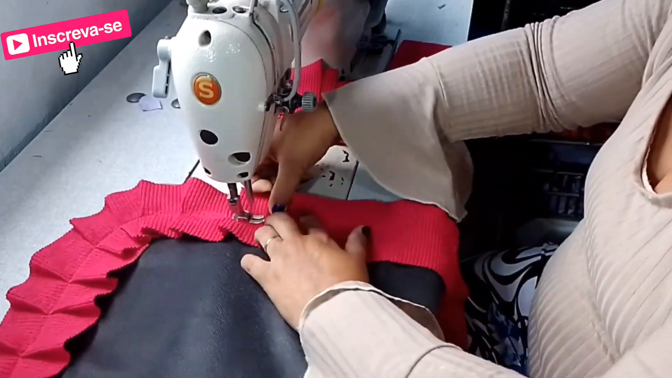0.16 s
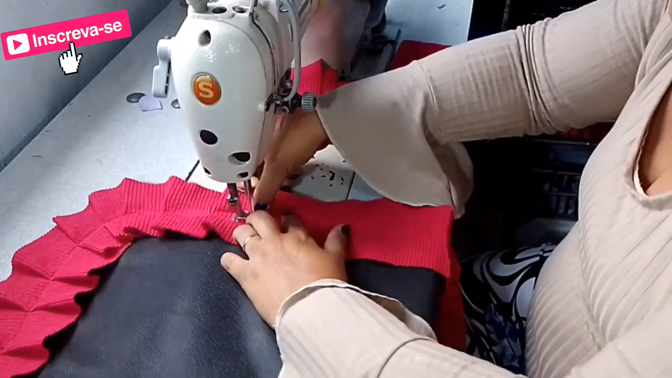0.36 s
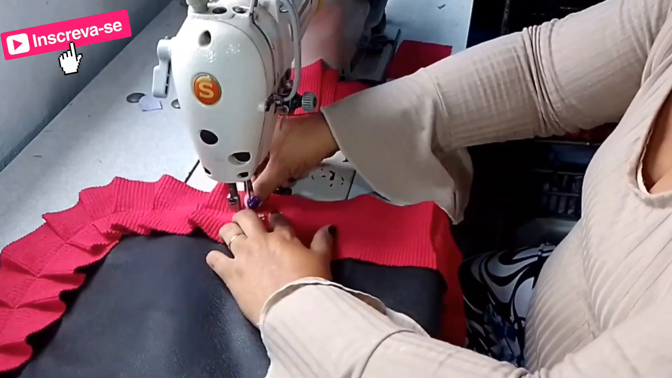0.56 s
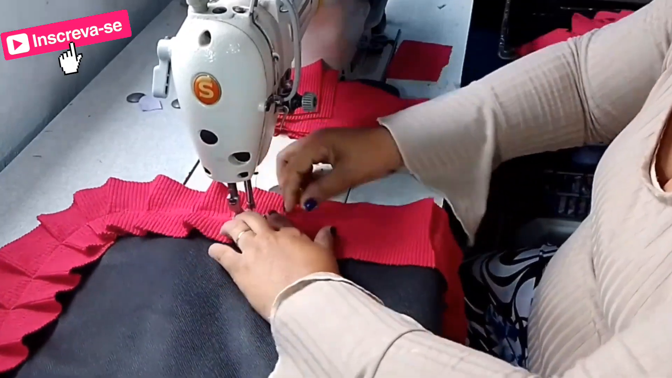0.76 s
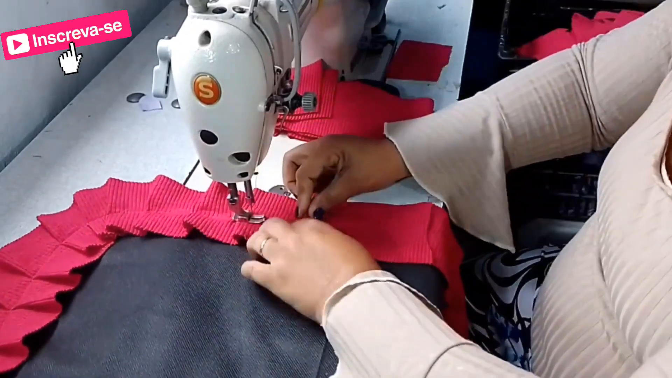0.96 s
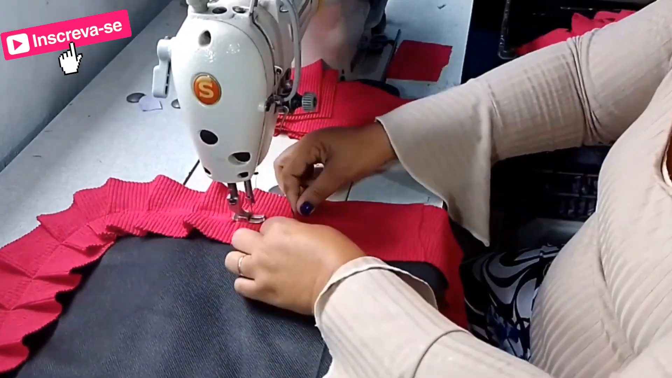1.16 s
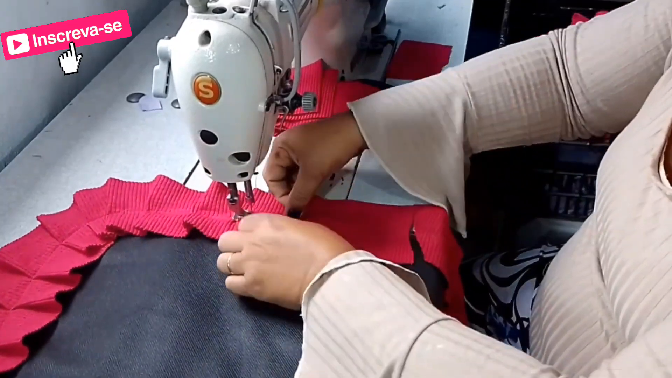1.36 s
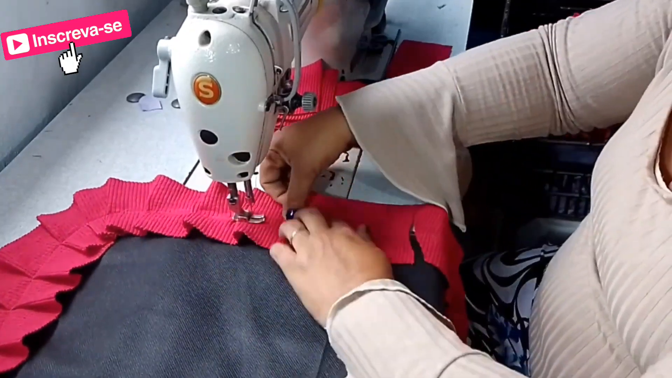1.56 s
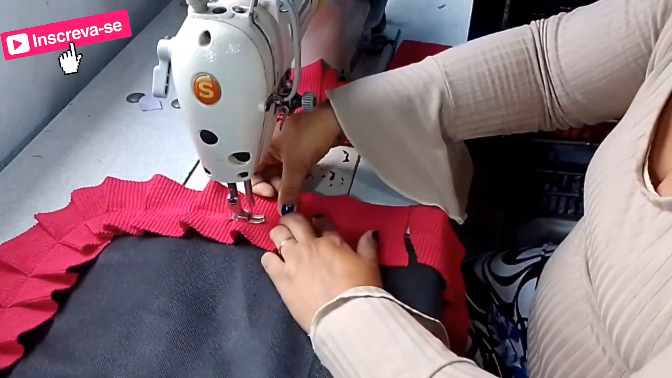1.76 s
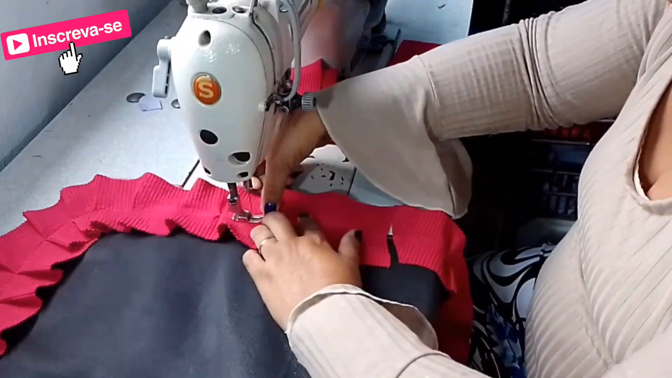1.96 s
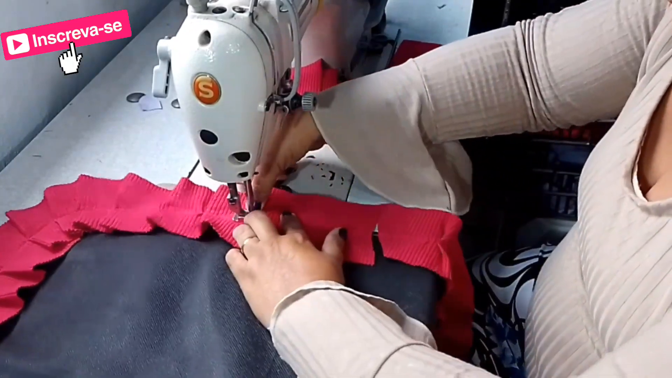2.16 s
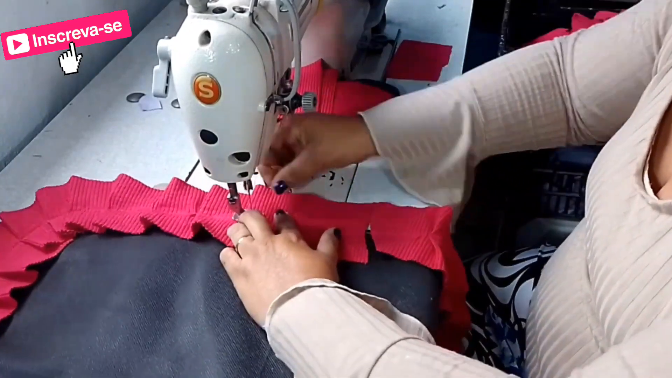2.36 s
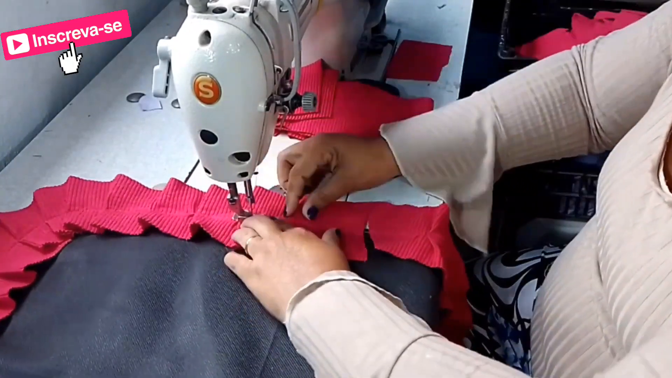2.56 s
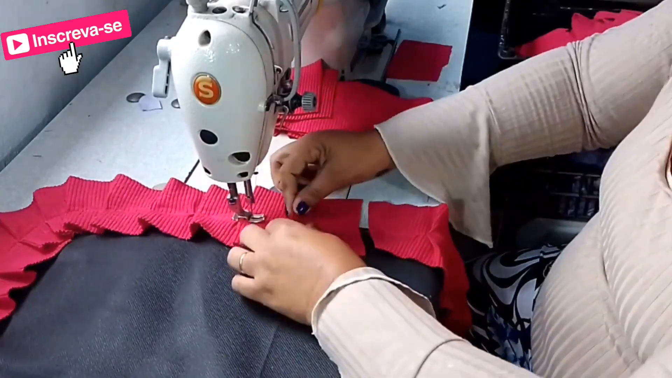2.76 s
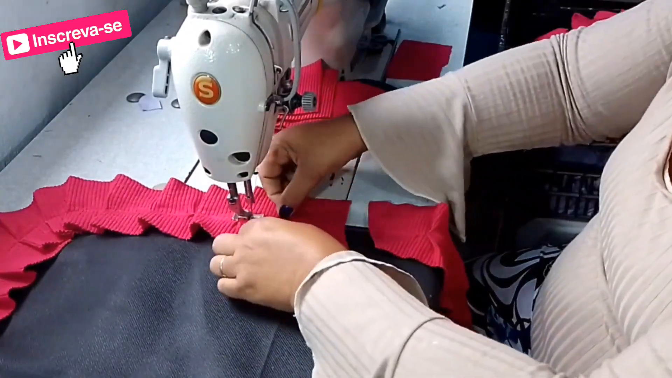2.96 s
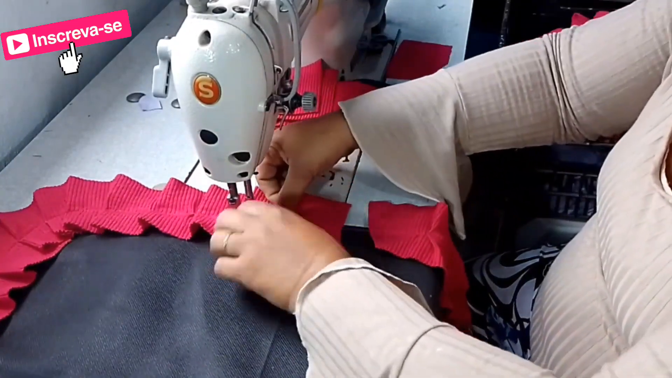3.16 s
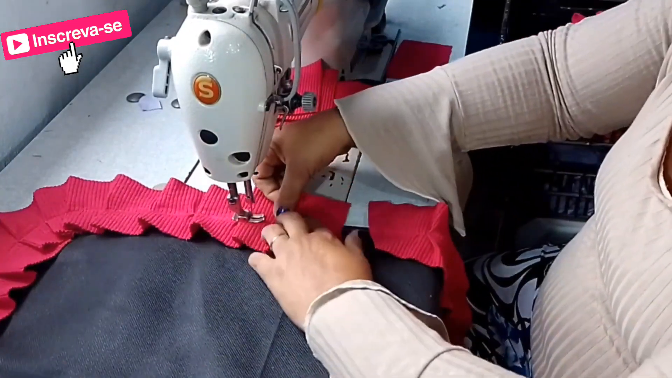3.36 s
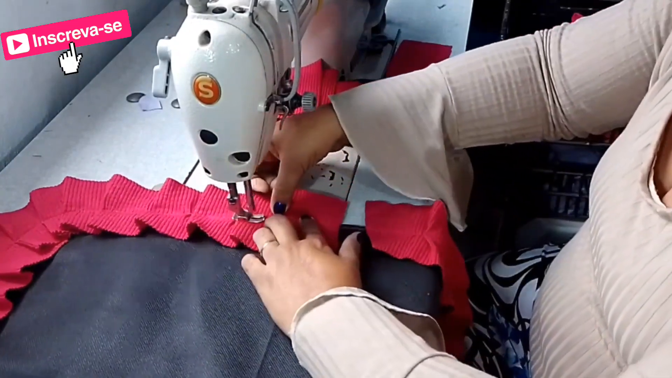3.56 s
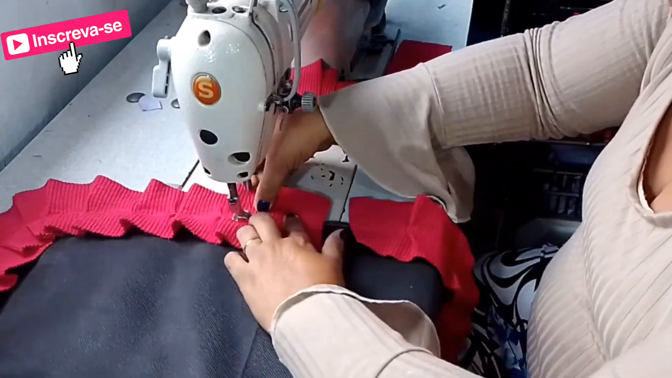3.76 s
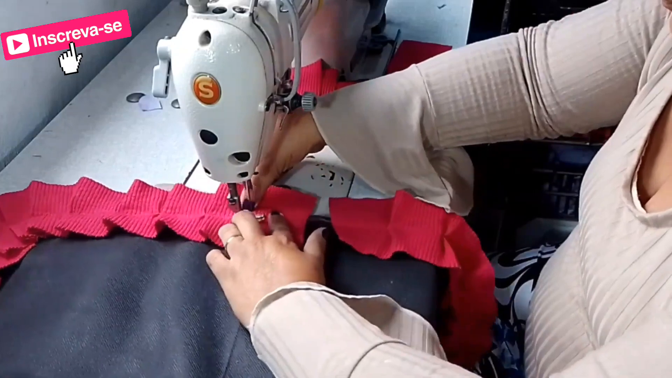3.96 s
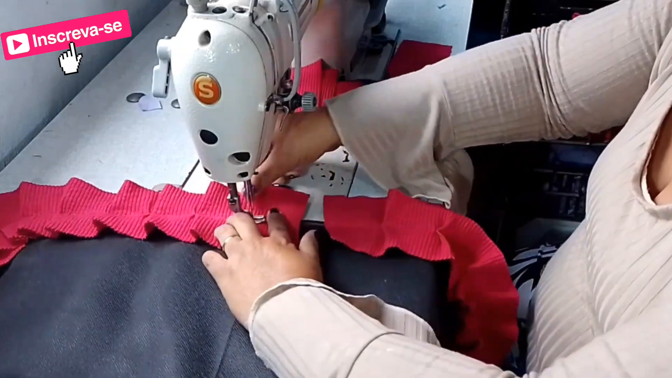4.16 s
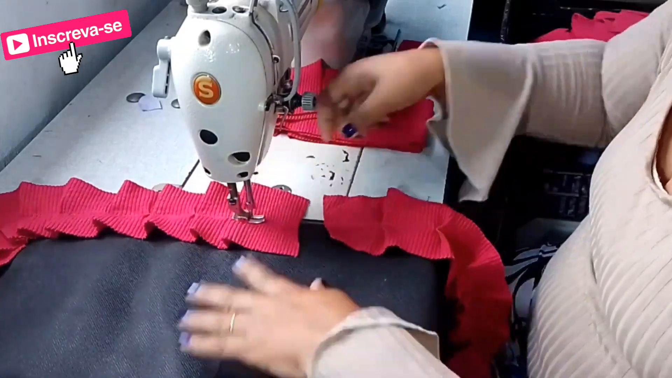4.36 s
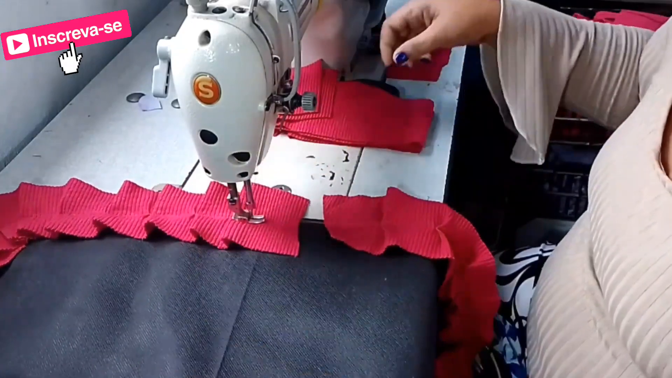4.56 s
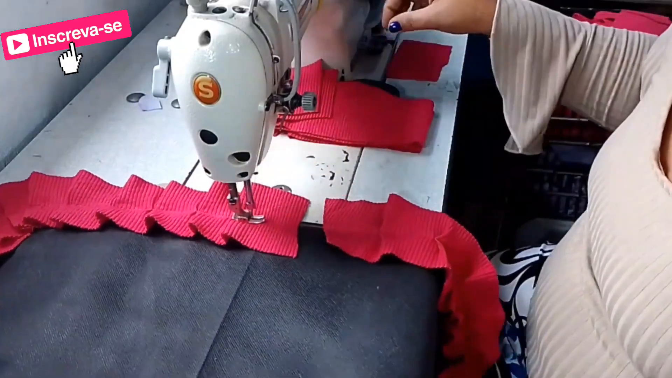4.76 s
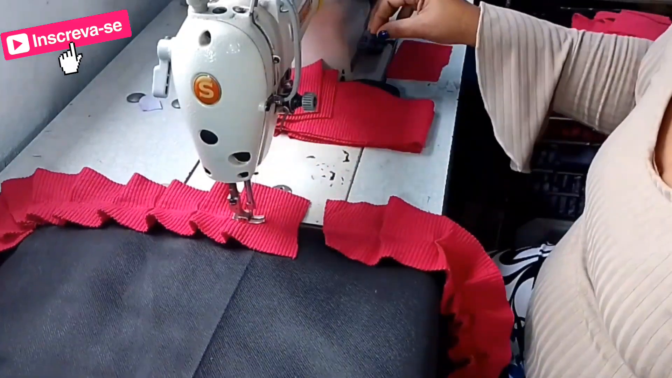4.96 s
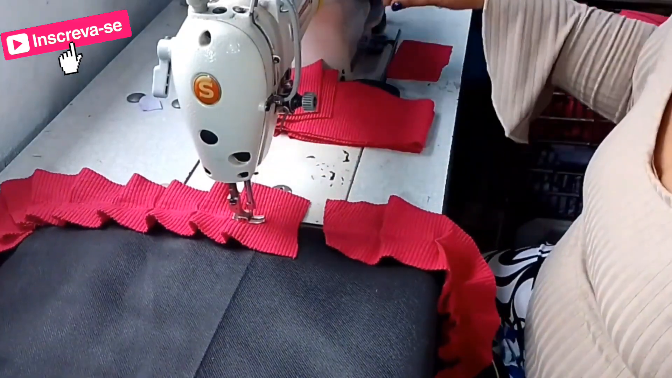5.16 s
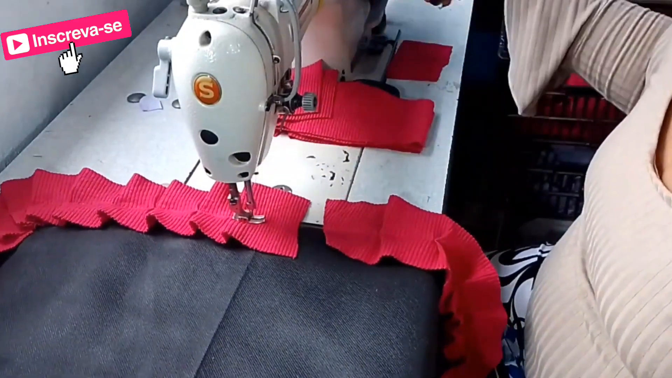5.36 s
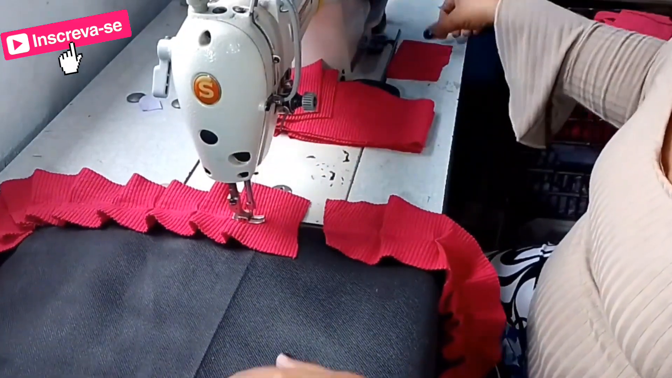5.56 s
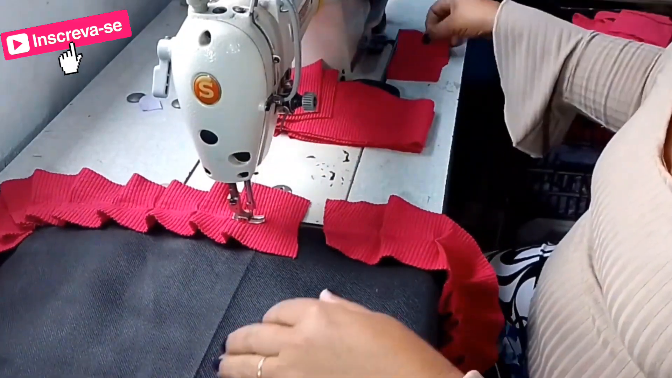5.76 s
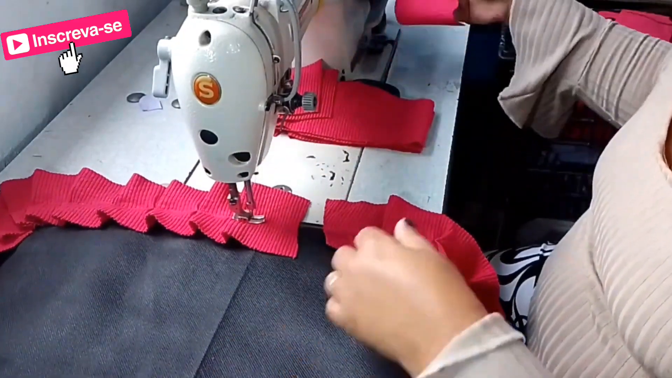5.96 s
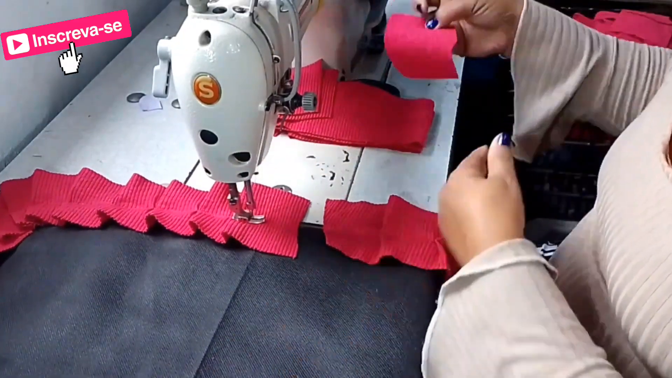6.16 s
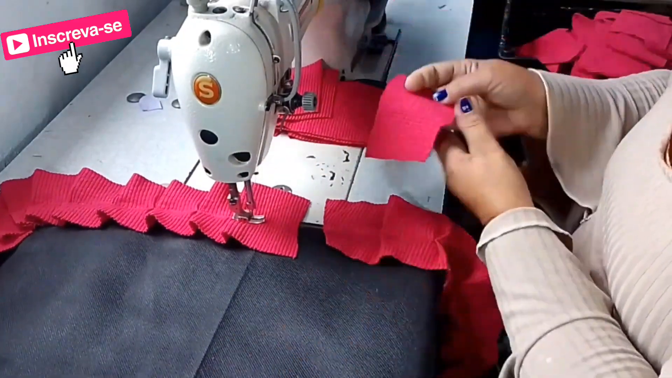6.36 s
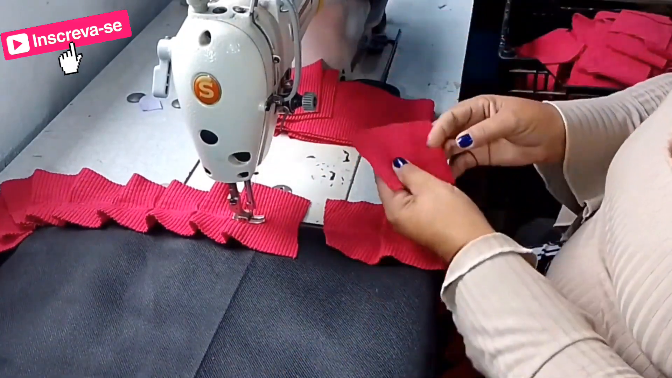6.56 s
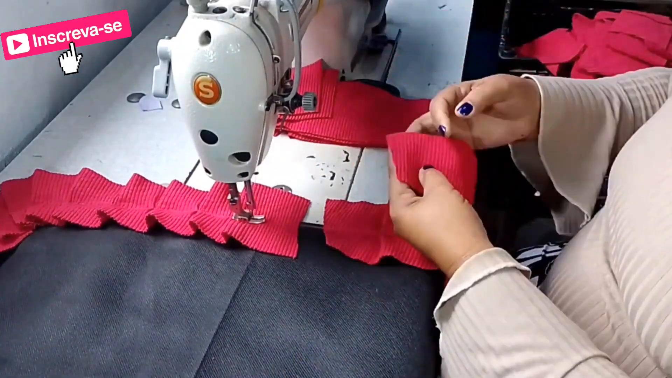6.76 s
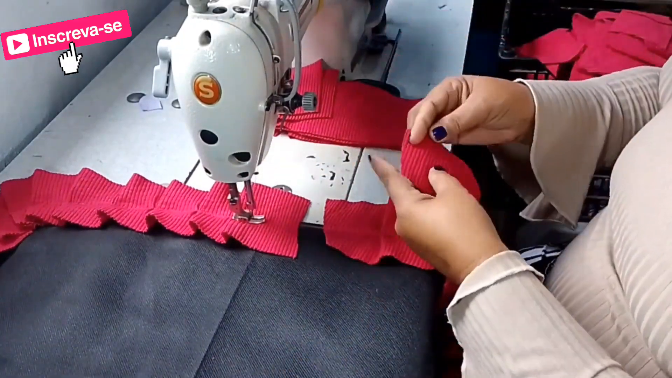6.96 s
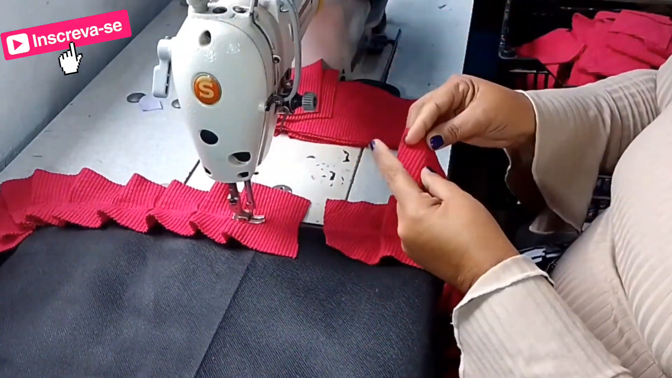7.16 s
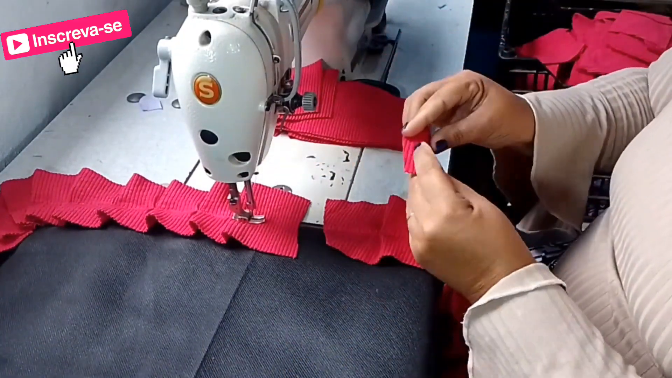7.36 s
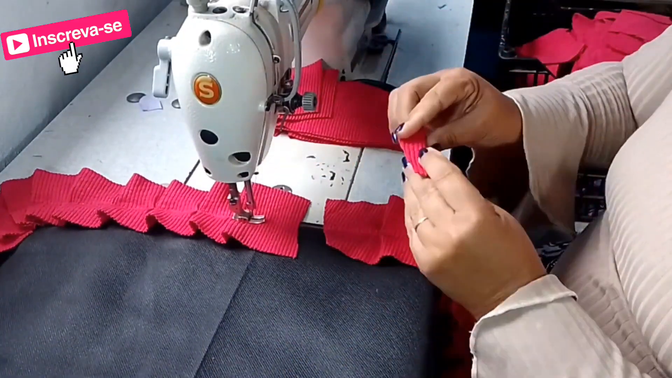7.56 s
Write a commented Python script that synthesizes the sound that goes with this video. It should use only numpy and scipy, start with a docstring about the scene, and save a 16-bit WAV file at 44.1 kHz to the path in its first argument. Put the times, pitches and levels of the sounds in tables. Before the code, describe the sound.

Steady low motor rumble and hum under a work table, close microphone, modest indoor reverberation. Three times a pedal engages the machine: a rough rising growl, a fast bright mechanical clatter with a shaking table, then thinning clacks and small metal pings as it coasts down. The middle burst is a little softer, the last fast and crisp. Afterwards the motor idles on alone, with faint airy hiss.

```python
"""Sewing machine, three short seams

An industrial sewing machine on its table, heard from close by in a workroom. The clutch motor idles all along:
mains hum, whine, fan air and a rumble of noise through table modes. Three times the pedal engages it: the clutch
growls, the head whirrs (shaped noise) and clacks (decaying noise bursts), the table shakes, the arm pings (sine),
thread and cloth tick (high-passed noise). Only head, table and clutch get a room tail.
"""
import sys
import numpy as np
from scipy import signal
from scipy.fft import rfft, irfft, next_fast_len
from scipy.io import wavfile
from scipy.ndimage import uniform_filter1d

SR = 44100
rng = np.random.default_rng(int(sys.argv[2]) if len(sys.argv) > 2 else 0)


def waveform_to_disk(signal):
    """Save audio, clipped to [-1, 1], as 16-bit WAV at the path in sys.argv[1]."""
    frames = np.transpose(np.atleast_2d(signal))
    scaled = np.clip(frames, -1, 1) * 32767
    samples = np.round(scaled).astype(np.int16)
    wavfile.write(sys.argv[1], SR, samples)


N = 336042
T = np.arange(N) / SR

# Idling motor in the table: (time [s], rumble [dB], 4th mains multiple [dB], 2nd and 3rd multiples [dB])
MOTOR = [(0, -36.5, -49, -74), (.08, -47.5, -59, -80), (.2, -42, -52, -74), (1.06, -46, -55, -82),
         (1.17, -39, -59, -80), (1.62, -47, -59.5, -76), (1.7, -39.5, -61, -75), (1.97, -44.5, -57, -74),
         (2.9, -43, -59.5, -80), (3.4, -43, -52, -77), (3.8, -46, -52.5, -74), (4.7, -43.5, -53.5, -73),
         (5.14, -40.5, -53, -75), (5.25, -45, -57, -77), (5.8, -44.5, -61, -74), (6.05, -47, -72, -98),
         (6.8, -45, -61, -92), (6.92, -44, -49.5, -73), (7.62, -43.5, -53, -76)]
# Steady hum: (multiple of the mains, level [dB])
HUM = [(1, -74), (11, -81.5), (12, -74), (13, -68.5), (15, -96)]
# Low hum, relative: (multiple of the mains, level [dB])
LOW_HUM = [(2, -4), (3, -4.5)]
# Table modes under the motor's rumble: (frequency [Hz], width [Hz], level [dB])
TABLE_MODES = [(283, 66, -20.5), (316.7, 29.2, 2), (374, 20, -31), (380.8, 45.8, 5), (431.1, 10, -2.5),
               (450.5, 13.5, -44)]
# Upper table modes: (frequency [Hz], width [Hz], level [dB])
UPPER_TABLE_MODES = [(483.8, 69, -0.5), (532, 37, 2)]
# Thin steady tones of the idling motor: (frequency [Hz])
WHINE_HZ = [3451, 3530, 3698, 4199, 4317, 4380, 4678, 4877, 6169, 6400, 6589, 7058, 7149, 7617, 7887, 8371,
            8866, 9017, 9238, 9577]
# Their levels: (level [dB])
WHINE_DB = [-85, -86.5, -87, -94, -83, -99, -90, -100, -92, -87, -92, -84, -87, -105, -106, -81, -94, -85,
            -84, -84]
# Whines that come in as a seam ends: (frequency [Hz], start [s], end [s], level [dB])
SWELLS = [(3455, 1.12, 1.36, -72), (4877, 2.8, 3.85, -82), (4317, 2.8, 3.08, -83), (7058, 4.7, 7.62, -86)]
# Broad shape of the stirred air: (frequency [Hz], relative level per Hz [dB])
AIR_SHAPE = [(25, 14), (90, -15), (200, -16), (500, 9), (650, -3), (900, 1.5), (1500, -1.5), (2300, -10.5),
             (3900, -14), (5800, -15), (8000, -9.5), (9500, -18), (11000, -14.5), (16000, -27)]
# Fan bands: (frequency [Hz], width [Hz], level [dB])
FAN_BANDS = [(702.5, 27, -74), (1146, 107, -68), (1242, 117, -70), (3536, 94, -81.5), (9430, 1130, -72.5)]

# Seams: (pedal down [s], hook bites [s], pedal up [s], whirr strength at full speed [dB], added load [dB])
SEAMS = [(.337, 0.407, .80, -35, -1), (2.003, 2.05, 2.51, -37.5, -1), (3.828, 3.873, 4.26, -34.5, -0.5)]
# Load in every seam, at pedal down, clutch bitten, full speed, pedal up, end of coasting, motor settled
# Table shaking: (level [dB])
SHAKE_DB = (-61, -44.5, -39.5, -40, -65.5, -106)
# Clutch growl: (level [dB])
GROWL_DB = (-47.5, -35.5, -35, -39.5, -68, -90)
# Motor rumble: (level [dB])
RUMBLE_DB = (-36.5, -37.5, -31.5, -37.5, -50, -79)
# Upper table modes: (level [dB])
UPPER_DB = (-57, -48, -45, -48, -50.5, -54)
# Fourth mains multiple: (level [dB])
FOURTH_DB = (-52.5, -47, -50, -61, -72, -78)
# Second and third mains multiples: (level [dB])
SECOND_DB = (-66, -62, -67.5, -67.5, -86, -95)

# Clutch resonances: (frequency [Hz], width [Hz], level [dB])
CLUTCH_MODES = [(797.4, 69, -1.5), (881, 71, -3), (962, 68, -3), (1067, 68, -8.5), (1160, 270, -7.5),
                (1456, 134, -11.5)]
# Table modes shaken by the head: (frequency [Hz], width [Hz], level [dB])
SHAKEN_TABLE_MODES = [(111, 127, -18.5), (200.5, 42, -14.5), (260, 44, -4), (606.6, 54, -2.5),
                      (662, 27, -2), (733.4, 60, -1.5)]
# Clacks of needle bar and feed dog: (time [s], strength [dB])
CLACKS = [(0.421, -42), (0.495, -24), (0.528, -21), (0.567, -21), (.603, -18), (.639, -17.5), (0.6695, -15),
          (.7006, -16), (0.7318, -17), (0.766, -18.5), (0.801, -20.5), (.8385, -19.5), (0.8856, -25),
          (0.941, -30), (.9847, -34), (1.027, -31), (1.0584, -34), (1.106, -38.5), (2.0694, -53),
          (2.1084, -43), (2.145, -48), (2.175, -28.5), (2.2204, -32), (2.2406, -23), (2.2784, -22.5),
          (2.3183, -20), (2.365, -20.5), (2.39, -21), (2.425, -18), (2.4727, -22.5), (2.499, -20),
          (2.589, -25.5), (2.647, -26), (2.7302, -34.5), (2.745, -36), (2.8145, -36.5), (3.8854, -60),
          (3.9198, -45), (3.9611, -29.5), (4.0033, -41), (4.0295, -29.5), (4.064, -22.5), (4.0966, -16.5),
          (4.127, -16), (4.1541, -17), (4.183, -15), (4.212, -16), (4.242, -18), (4.2746, -17.5),
          (4.3132, -22.5), (4.3696, -23.5), (4.417, -25.5), (4.4624, -44), (4.502, -30.5), (4.529, -34),
          (4.579, -32)]
# Broad rings of each clack: (frequency [Hz], width [Hz], level [dB])
KNOCK_MODES = [(2820, 200, -4), (3230, 320, 0), (4160, 300, -4), (4955, 260, -5), (5350, 300, -8),
               (6600, 700, -5)]
# Head modes: (frequency [Hz], width [Hz], level [dB])
HEAD_MODES = [(1480, 70, -4), (1755, 55, -1), (2820, 50, -2), (3230, 80, 0), (4160, 120, -3),
              (4960, 60, -3), (5350, 60, -3), (6390, 60, -3), (7070, 70, -3)]
# Head modes in the treble: (frequency [Hz], width [Hz], level [dB])
HEAD_TOP_MODES = [(7930, 110, -0.5), (8660, 95, 5), (9000, 36, 8), (9100, 50, -7.5), (9280, 55, 4),
                  (9500, 210, -7.5), (9920, 200, 4), (10580, 470, 1.5)]
# Shape of the whirr of hook and gears: (frequency [Hz], relative level per Hz [dB])
WHIRR_SHAPE = [(530, -39), (900, -2), (1440, -1.5), (1720, 2), (2390, -4.5), (3200, -6), (3650, -5),
               (4980, -6), (5840, -7), (8500, -12), (11000, -27), (18700, -120)]
# Shape of its treble: (frequency [Hz], relative level per Hz [dB])
WHIRR_TOP_SHAPE = [(3820, -43), (6500, -11), (6790, -5.5), (7440, -6), (8370, 1.5), (9620, 0.5),
                   (13600, -6.5), (14900, -21), (15600, -9)]
# Pings of the arm: (time [s], strength [dB])
PINGS = [(.5287, -39), (.8864, -37), (.942, -41), (1.0274, -43), (1.105, -41), (2.146, -45), (2.3171, -40),
         (2.426, -41), (2.646, -37), (3.9, -45), (3.9615, -40.5), (4.3705, -34), (4.4624, -40),
         (4.502, -45.5), (4.577, -43)]
# Ticks of thread and cloth: (time [s], strength [dB])
TICKS = [(2.108, -20), (2.144, -38), (2.2194, -35), (3.92, -40), (4.5301, -24), (5.0315, -54),
         (5.1602, -50), (5.1726, -46), (5.1814, -57), (5.1924, -56)]

MAINS_HZ, SHAFT_HZ, ARM_HZ = 60, 56.68, 2218
AIR_DB = -63
IDLE_UPPER_DB = -25.5  # against the rumble
# speed rises, sags to SLOWEST_SHARE of full, then halts
RUN_UP_S, COAST_S, STOP_S, SLOWEST_SHARE = 0.25, 0.35, 0.039, 0.3
BITE_S, SETTLE_S, FADE_S = 0.074, 0.29, 0.25  # clutch takes hold; motor recovers; load fades
WHIRR_POWER, TOP_POWER = 1.79, 1.17  # powers of speed
TOP_DB = 0.5
CREEP_DB = -2  # whirr before the hook bites, against after
CLACK_BODY_DB = -13  # share of a clack that drives the head
CLACK_TOP_DB, SLOW_TOP_DB = -18.5, 32  # clack treble at full speed; extra towards standstill
THUD_DB, THUD_SCATTER_DB, PEDAL_THUD_DB = -21, 3, -46
BODY_HZ = 1270  # below this a slow head hardly sounds
ROOM_T60_S, ROOM_DB = 0.61, -12
TOP_HZ = 15480


def undb(db):
    """Amplitude of a level in dB."""
    return 10 ** (np.asarray(db) / 20)


def unit(x):
    """Scale to rms 1."""
    return x / np.sqrt(np.mean(x ** 2))


def noise(grain_db=0):
    """Noise of tiny impacts; grain_db spreads their sizes."""
    grain = np.minimum(rng.exponential(size=N), 5)
    return unit(rng.standard_normal(N) * undb(grain_db * grain))


def walk(rate_hz):
    """Random levels held 1 / rate_hz and slewed twice; rms 1."""
    hold = int(SR / rate_hz)
    steps = np.repeat(rng.standard_normal(N // hold + 1), hold)
    return unit(uniform_filter1d(uniform_filter1d(steps, hold), hold)[:N])


def high_pass(x, hz, order=2):
    """Butterworth high-pass."""
    return signal.sosfilt(signal.butter(order, hz, "high", fs=SR, output="sos"), x)


def ring(x, modes, order=1):
    """Sum of band-pass resonances, steeper with order; each passes white noise of rms 1 near its own dB."""
    out = 0
    for hz, width_hz, db in modes:
        r = np.exp(-np.pi * width_hz / SR)
        section = [1 - r, 0, r - 1, 1, -2 * r * np.cos(2 * np.pi * hz / SR), r * r]
        gain = undb(db) * np.sqrt(order / (1 - r))
        out = out + gain * signal.sosfilt([section] * order, x)
    return out


def colour(x, points):
    """Broad spectral shape; white noise keeps its rms."""
    hz, db = np.transpose(points)
    size = next_fast_len(N)
    bin_hz = np.arange(size // 2 + 1) * SR / size
    gain = undb(np.interp(np.log(bin_hz + 1), np.log(hz), db, left=-90, right=-90))
    return irfft(rfft(x, size) * unit(gain), size)[:N]


def blows(at_s, db, t60_s, rise_s):
    """Envelope that swells over rise_s at each blow and dies away."""
    kicks = np.zeros(N)
    kicks[(np.asarray(at_s) * SR).astype(int)] = undb(db)
    tail = signal.lfilter([1], [1, -np.exp(-np.log(1000) / (t60_s * SR))], kicks)
    slew = np.exp(-1 / (max(rise_s, 1 / SR) * SR))
    return signal.lfilter([1 - slew], [1, -slew], tail)


def tones(freqs_hz, levels_db, waver_db):
    """Nearly steady sines, each wavering a little in level and phase."""
    out = 0
    for hz, db in zip(freqs_hz, levels_db):
        level = np.sqrt(2) * undb(db + waver_db * walk(3.984))
        turns = hz * T + rng.random() + hz / 40000 * walk(15)
        out = out + level * np.sin(2 * np.pi * turns)
    return out


def speed():
    """Share of full speed of the head through the seams."""
    at_s = [(down, down + RUN_UP_S, up, up + COAST_S, up + COAST_S + STOP_S) for down, _, up, *_ in SEAMS]
    return np.interp(T, np.ravel(at_s), np.tile([0, 1, 1, SLOWEST_SHARE, 0], len(SEAMS)))


def load(stage_db):
    """Gain that glides through the same stages in every seam, offset by the seam's load."""
    at_s, db = [], []
    for down, _, up, _, load_db in SEAMS:
        settled = up + COAST_S + SETTLE_S
        at_s += [down - 0.008, down, down + BITE_S, down + RUN_UP_S, up, up + COAST_S, settled, settled + FADE_S]
        db += list(np.r_[-80, stage_db, -80] + load_db)
    return undb(np.interp(T, at_s, db))


def steady(x):
    """Rms 1 over every fifth of a second: the motor drives the table evenly."""
    return x / np.sqrt(uniform_filter1d(x ** 2, size=9000))


def mains(rows, waver_db):
    """Tones on multiples of the mains."""
    multiple, db = np.transpose(rows)
    return tones(MAINS_HZ * multiple, db, waver_db)


def table_rumble(idle):
    """Rough running excites the table modes, more under load."""
    low = steady(ring(noise(), TABLE_MODES, order=2))
    upper = steady(ring(noise(), UPPER_TABLE_MODES, order=2))
    low_level = np.hypot(idle, load(RUMBLE_DB))
    upper_level = np.hypot(idle * undb(IDLE_UPPER_DB), load(UPPER_DB))
    return low_level * low + upper_level * upper


def windings(hum, low_hum):
    """Windings hum on mains multiples, with bands of noise around the low ones; load adds to these."""
    fourth = mains([(4, -2.5)], waver_db=0.5) + ring(noise(), [(242.8, 33, -7.0)], order=2)
    second = mains(LOW_HUM, waver_db=2) + ring(noise(), [(130, 120, -20)], order=2)
    fourth_level = np.hypot(hum, load(FOURTH_DB))
    second_level = np.hypot(low_hum, load(SECOND_DB))
    return fourth_level * fourth + second_level * second + mains(HUM, waver_db=0.4)


def whine():
    """Thin wavering tones all along, others gated in as a seam ends."""
    out = tones(WHINE_HZ, WHINE_DB, waver_db=1.5)
    for hz, start_s, end_s, db in SWELLS:
        gate = uniform_filter1d(1.0 * ((T > start_s) & (T < end_s)), size=3000)
        out = out + gate * tones([hz], [db], waver_db=2.5)
    return out


def fan_air():
    """The fan stirs the air: broad noise plus bands, slowly wavering."""
    broad = undb(AIR_DB) * colour(noise(), AIR_SHAPE)
    return undb(0.6 * walk(1.22)) * (broad + ring(noise(), FAN_BANDS, order=2))


def motor():
    """Table rumble, winding hum, whine and fan air of the motor."""
    at_s, *columns = np.transpose(MOTOR)
    idle, hum, low_hum = (undb(np.interp(T, at_s, db)) for db in columns)
    return table_rumble(idle) + windings(hum, low_hum) + whine() + fan_air()


def thuds():
    """Low blow envelopes at each clack and pedal press, which drive table and clutch."""
    at_s, clack_db = np.transpose(CLACKS)
    down = np.transpose(SEAMS)[0]
    thud_db = clack_db + THUD_DB + THUD_SCATTER_DB * rng.standard_normal(len(at_s))
    pedal_db = np.full(len(down), PEDAL_THUD_DB)
    return blows(np.r_[at_s, down], np.r_[thud_db, pedal_db], t60_s=0.023, rise_s=0.00054)


def growl():
    """Narrow rough tone that climbs as the clutch takes up the load, then gives way."""
    down, _, up, *_ = np.transpose(SEAMS)
    since_s = T - down[np.searchsorted(up[:-1] + COAST_S, T)]
    hz = 800 + 550 * np.clip(since_s, 0, 0.25)
    rough = np.sqrt(2) * (0.23 + 1.05 * walk(110))
    fade = np.clip((0.23 - since_s) / 0.075, 0, 1)
    return rough * np.sin(2 * np.pi * np.cumsum(hz) / SR) * fade


def clutch(thud):
    """The slipping clutch grips hardest once a turn of the motor shaft; thuds ring it too."""
    grip = load(GROWL_DB) * (1 + 0.93 * np.cos(2 * np.pi * SHAFT_HZ * T))
    rub = ring(noise() * (grip * undb(-6.0) + thud), CLUTCH_MODES, order=2)
    return rub + grip * undb(-8) * growl()


def shaken_table(thud):
    """Load and thuds drive the table modes with noise."""
    return ring(noise() * (load(SHAKE_DB) + thud), SHAKEN_TABLE_MODES, order=2)


def rattle(x, modes, patchy_db=2.5):
    """Every stroke strikes the parts differently, so each mode comes and goes on its own."""
    return sum(ring(x * undb(patchy_db * walk(35)), [mode]) for mode in modes)


def head():
    """Dense small impacts and the listed clacks drive the broad body and the modes of the head."""
    _, bite, up, full_db, _ = np.transpose(SEAMS)
    at_s, clack_db = np.transpose(CLACKS)
    full, pace = undb(np.interp(T, up, full_db)), speed()
    bitten = uniform_filter1d(1.0 * sum((T > s) & (T < s + 1) for s in bite), size=900)

    whirr = noise(grain_db=1.0) * full * pace ** WHIRR_POWER * undb(CREEP_DB * (1.5 - bitten))
    clack = noise(grain_db=3.0) * blows(at_s, clack_db + CLACK_BODY_DB, t60_s=0.081, rise_s=0.0005)
    body = colour(whirr + 1.16 * high_pass(clack, 2200, order=1), WHIRR_SHAPE)

    # slow strokes are thin and bright
    slow_db = SLOW_TOP_DB * (1 - np.interp(at_s, T, pace))
    clack_top = blows(at_s, clack_db + CLACK_TOP_DB + slow_db, t60_s=0.072, rise_s=0.00035)
    whirr_top = bitten * full * pace ** TOP_POWER * undb(TOP_DB)
    top = noise(grain_db=3.0) * (whirr_top + clack_top)
    shrill = colour(top, WHIRR_TOP_SHAPE)
    dull = signal.sosfilt(signal.butter(4, 11000, fs=SR, output="sos"), shrill)

    # the faster the head runs, the harder its impacts: fuller body, brighter top
    hard = pace ** 1.3
    body = hard * body + (1 - hard) * high_pass(body, BODY_HZ)
    treble = hard * shrill + (1 - hard) * dull
    modes = undb(-21.5) * rattle(whirr, HEAD_MODES) + undb(-18) * rattle(top, HEAD_TOP_MODES)
    knock = undb(-6.5) * ring(clack, KNOCK_MODES, order=2)
    return body + treble + modes + knock


def arm():
    """The arm casting pings briefly at some clacks: a decaying sine of rough level."""
    at_s, ping_db = np.transpose(PINGS)
    envelope = blows(at_s, ping_db, t60_s=0.096, rise_s=0.0015)
    return envelope * (0.89 + 0.48 * walk(300)) * np.sin(2 * np.pi * ARM_HZ * T)


def cloth():
    """Thread and cloth tick: very short bursts of high-passed noise."""
    at_s, db = np.transpose(TICKS)
    return high_pass(noise() * blows(at_s, db, t60_s=0.0083, rise_s=0.00039), 9500)


def room(x):
    """Diffuse tail after the first wall, duller than the direct sound."""
    t = T[:SR]
    tail = rng.standard_normal(SR) * np.exp(-np.log(1000) * t / ROOM_T60_S) * (t > 0.006)
    tail = signal.lfilter([1], [1, -0.25], tail)
    tail = tail / np.sqrt(np.sum(tail ** 2))
    return undb(ROOM_DB) * signal.fftconvolve(x, tail)[:N]


def scene():
    """Motor throughout; machine with its room tail, pings and ticks on top; one channel."""
    idling = motor()
    thud = thuds()
    machine = clutch(thud) + shaken_table(thud) + head()
    return (idling + machine + room(machine) + arm() + cloth())[None]


def record(dry):
    """High-pass thins the bass; a steep low-pass cuts the top."""
    thin = high_pass(dry, 70)
    return signal.sosfilt(signal.ellip(10, 0.2, 80, TOP_HZ, fs=SR, output="sos"), thin)


dry = scene()
out = record(dry)
waveform_to_disk(out)
```